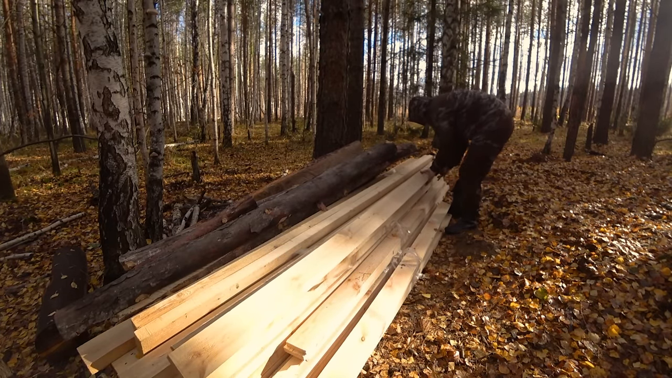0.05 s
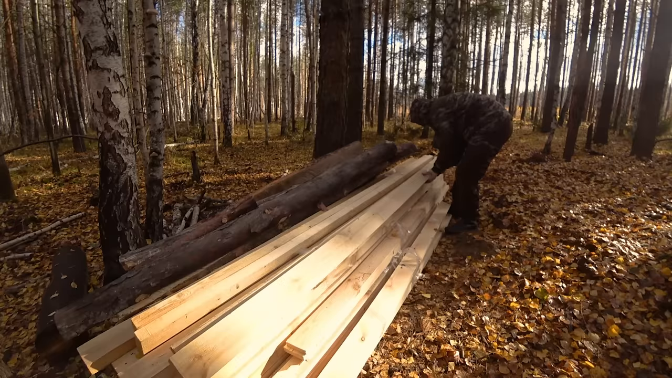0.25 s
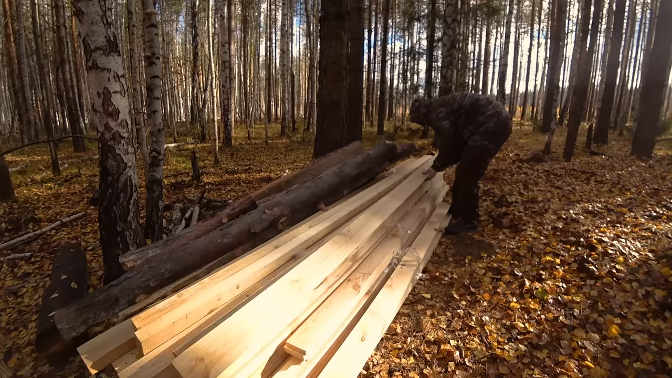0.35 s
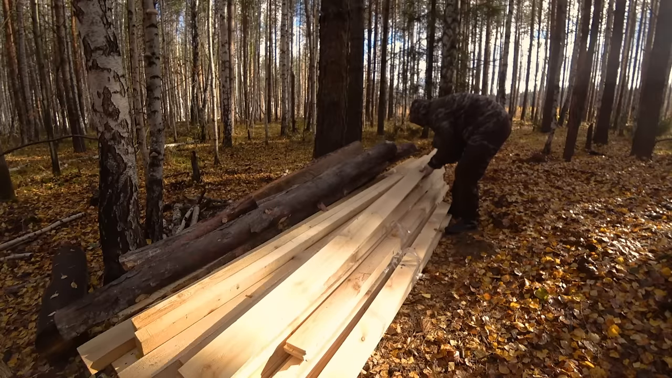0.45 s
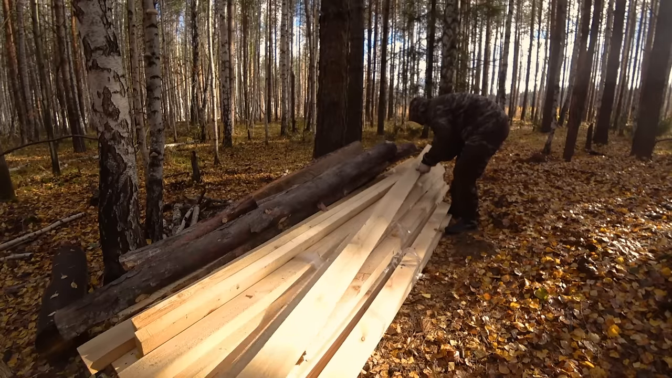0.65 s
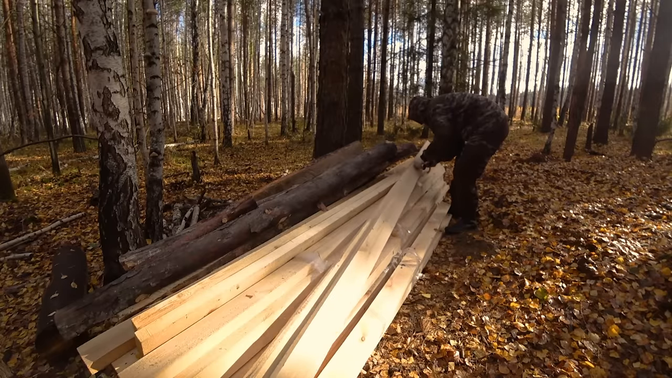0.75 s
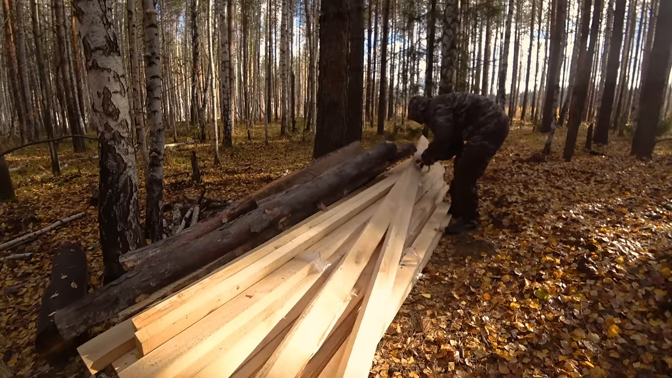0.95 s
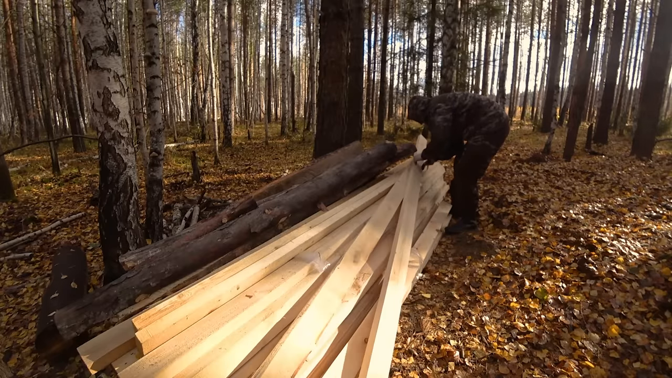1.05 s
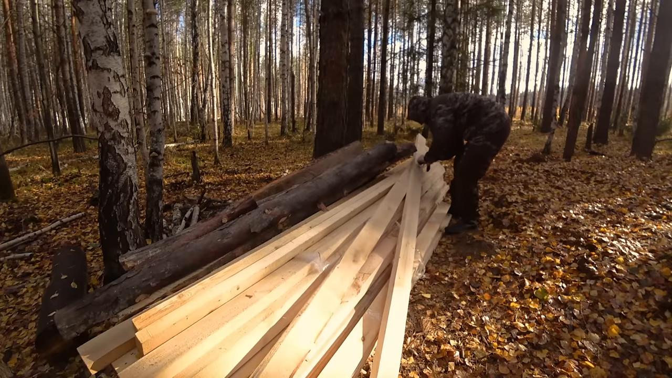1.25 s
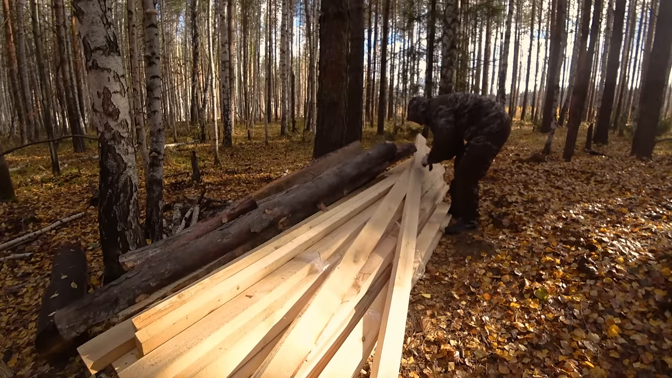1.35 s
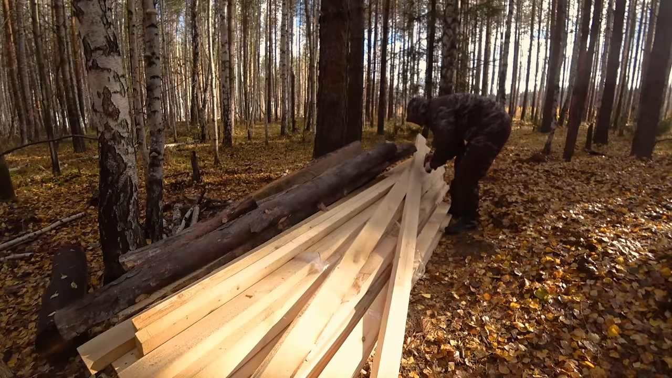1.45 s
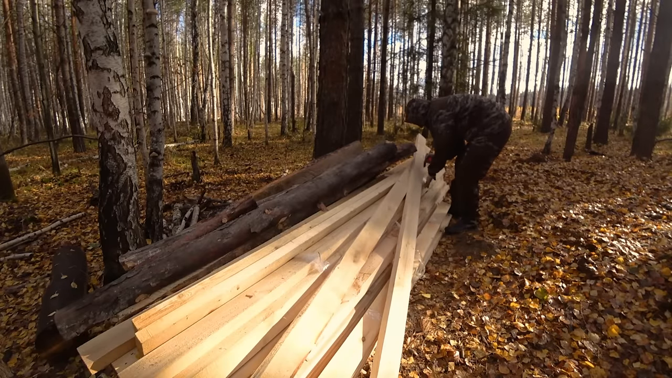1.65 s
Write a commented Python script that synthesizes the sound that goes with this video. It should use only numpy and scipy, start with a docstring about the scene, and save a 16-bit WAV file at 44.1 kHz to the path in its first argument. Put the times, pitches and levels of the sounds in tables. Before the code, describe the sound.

Wooden boards knock and scrape on a pile, with dry leaves crunching in a quiet forest

```python
"""Shifting boards in an autumn forest

Long sawn boards are shifted on a pile, a few metres from a small camera with two microphone ports.
Knocks ring decaying board modes, random grains make the boards slide and the dry leaves crunch,
and short noise bursts snap; a board end thuds on the soil as a low decaying sine.
The trunks return the wood sounds as a short noise tail, over a faint hush of shaped noise."""
import sys
import numpy as np
from scipy import signal
from scipy.fft import rfft, irfft
from scipy.io import wavfile
from scipy.ndimage import uniform_filter1d

SR = 44100
rng = np.random.default_rng(int(sys.argv[2]) if len(sys.argv) > 2 else 0)


def store_pcm(level_fs):
    """Save levels as 16-bit WAV."""
    pcm = np.round(np.clip(level_fs, -1, 1) * 32767).astype(np.int16)
    wavfile.write(sys.argv[1], SR, np.atleast_2d(pcm).T)


N = 77175

# modes of the board that is lifted and dragged: (frequency [Hz], level [dB], full t60 [s])
LIFTED_MODES = [(253, -9, 0.12), (282.6, -13, 0.29), (433, -4.5, 0.032), (522, -6, 0.13),
                (595.7, 0.5, 0.089), (718, 1.5, 0.12), (853.6, 2.5, 0.04)]
# short edge modes that all boards share: (frequency [Hz], level [dB], full t60 [s])
EDGE_MODES = [(1042, 7, 0.015), (1382, 7.5, .02), (1554, 7, 0.018), (1738, 7, 0.033), (1931, 9, 0.034),
              (2176, 13, 0.016), (2620, -1.5, .028)]


def undb(db):
    """Gain of a level in dB."""
    return 10 ** (np.asarray(db) / 20)


def unit(x):
    """Scale to rms 1."""
    return x / np.sqrt(np.mean(x ** 2))


def curve(table, index):
    """A table column in dB as a gain for every sample, at -120 dB outside the table."""
    rows = np.array(table)
    return undb(np.interp(np.arange(N) / SR, rows[:, 0], rows[:, index], left=-120, right=-120))


def over_frequency(table):
    """Second table column at every spectrum bin, interpolated along log frequency."""
    rows = np.array(table)
    hz = np.arange(N // 2 + 1) * SR / N + 1  # 1 Hz up, so that the log exists
    return np.interp(np.log(hz), np.log(rows[:, 0]), rows[:, 1])


def colour(x, table):
    """Shape a spectrum by (frequency [Hz], gain [dB]) points."""
    return irfft(rfft(x) * undb(over_frequency(table)), N)


def ring(x, hz, t60):
    """One decaying mode struck by x: a complex one-pole resonator."""
    pole = np.exp(2j * np.pi * hz / SR - np.log(1000) / (max(t60, .004) * SR))
    return signal.lfilter([1], [1, -pole], x).imag


def band(x, hz, width_hz):
    """Band-pass with four poles."""
    low_hz = np.sqrt(hz ** 2 + width_hz ** 2 / 4) - width_hz / 2
    sos = signal.butter(2, [low_hz, low_hz + width_hz], "bandpass", fs=SR, output="sos")
    return signal.sosfilt(sos, x)


def grains(rate, spread_db):
    """Tiny clicks at random times (rate per second), of random sign and uneven size."""
    chance, sign, size = rng.random((3, N))
    size_db = spread_db * np.minimum(-np.log(1 - size), 4)
    return (chance < rate / SR) * np.sign(sign - .5) * undb(size_db)


def place(t, x):
    """x laid at time t in a silent track."""
    out, start = np.zeros(N), int(t * SR)
    out[start:start + len(x)] = x[:N - start]
    return out


def hush():
    """Steady forest air: noise with a falling spectrum."""
    # colour of the air: (frequency [Hz], relative level [dB per Hz])
    air = [(25, -10.5), (200, -5.5), (740, -10.5), (950, -15), (3300, -25.5), (4500, -21.5), (6000, -30),
           (10000, -39.5), (14000, -47)]
    level_db = -60.5
    return undb(level_db) * unit(colour(rng.standard_normal(N), air))


def trunks(x):
    """Scattered dull echoes off the trunks: x convolved with a decaying noise tail."""
    level_db, t60_s, top_hz, fade_in_s = -18.5, 0.2, 3220, 0.008
    t = np.arange(SR // 2) / SR
    tail = signal.lfilter(*signal.butter(1, top_hz, fs=SR), rng.standard_normal(len(t)))
    tail = tail * undb(-60 * t / t60_s) * np.minimum(t / fade_in_s, 1) ** 2
    tail = tail / np.sqrt(np.sum(tail ** 2))
    return undb(level_db) * signal.fftconvolve(x, tail)[:N]


def thuds():
    """A board end on the soil: a low sine that swells softly and decays."""
    # thuds: (time [s], level ahead of swell and decay [dB], frequency [Hz], t60 [s])
    soil_hits = [(1.191, -26, 81, 0.13), (1.289, -42, 57.4, 0.17)]
    rise_s = 0.017
    t = np.arange(SR // 3) / SR
    out = 0
    for start, db, hz, t60 in soil_hits:
        envelope = undb(db - 60 * t / t60) * (1 - np.exp(-t / rise_s))
        out = out + place(start, envelope * np.sin(2 * np.pi * hz * t))
    return out


def crunch():
    """Dense leaf grains that come in patches; low and high parts follow their own level."""
    # leaf levels: (time [s], rms level below the split [dB], rms level above it [dB])
    levels = [(.224, -53, -80), (.32, -59, -63), (.40, -53, -57.5), (.43, -45.5, -45.5),
              (.46, -48.5, -52.5), (.52, -33.5, -42.5), (.54, -45.5, -50), (.57, -28.5, -40),
              (.61, -43.5, -46.5), (.66, -47, -60), (.71, -39.5, -44), (.78, -50, -54), (.797, -30, -36),
              (.81, -52.5, -58), (.855, -49.5, -61.5), (.885, -51.5, -54), (.96, -43, -61.5),
              (1.0, -32.5, -34.5), (1.045, -40, -41.5), (1.06, -22.5, -34), (1.10, -33, -37),
              (1.125, -42.5, -50.5), (1.17, -37, -44), (1.21, -46, -47), (1.27, -48.5, -50.5),
              (1.38, -53.5, -48), (1.41, -66.5, -70.5), (1.655, -97.5, -82), (1.70, -60.5, -59.5),
              (1.725, -54, -56), (1.75, -88, -77)]
    # colour of the leaves: (frequency [Hz], relative level [dB per Hz])
    leaf = [(1500, -41.5), (2600, -7.5), (3100, -7), (3600, -12.5), (4140, -4), (5400, -6.5), (6860, -14.5),
            (8000, -11.5), (11000, -18.5), (16000, -43)]
    split_hz, patch_hz, patch_db = 4890, 159.3, 2.5
    hold = int(SR / patch_hz)  # samples that one patch lasts
    patches = np.repeat(rng.standard_normal(N // hold + 1), hold)
    patches = uniform_filter1d(patches, hold)[:N]
    leaves = colour(grains(rate=5000, spread_db=3.8) * undb(patch_db * patches), leaf)
    low = signal.sosfiltfilt(signal.butter(3, split_hz, fs=SR, output="sos"), leaves)
    high = leaves - low
    return unit(low) * curve(levels, index=1) + unit(high) * curve(levels, index=2)


def snaps():
    """Dry leaves and splinters: a click and a noisy crumble that dies in milliseconds, in three bands."""
    # snaps: (time [s], peak level ahead of the band levels [dB], extra level of the top band [dB])
    cracks = [(0.4231, -14.5, -18.5), (0.4378, -14, -32), (0.4963, -22, -10.5), (0.5231, -23, -7.5),
              (0.5533, -14.5, -14.5), (.569, -8, -19.5), (0.6898, -16, -16), (0.7034, -15, -15),
              (.760, -30.5, -4.5), (0.7957, -18, -8), (.8184, -24, -21), (0.9761, -9.5, -12),
              (.996, -10, -12), (1.005, -15, -19), (1.0182, -3.5, -16), (1.023, -15, -14),
              (1.0292, -11, -9), (1.102, -10.5, -39), (1.1597, -16.5, -22), (1.18, -16.5, -17),
              (1.1943, -16.5, -18.5), (1.306, -12, -10), (1.3404, -24.5, -16), (1.506, -40.5, -14),
              (1.5285, -58, -3), (1.5355, -51.5, -1.5), (1.551, -47, -16), (1.583, -43.5, -12),
              (1.652, -44, -11.5), (1.667, -41.5, -22), (1.696, -42, -28), (1.7205, -41.5, -33)]
    # bands: (centre [Hz], width [Hz], level [dB])
    bands = [(2820, 1130, -11.5), (4258, 900, -5.5), (7410, 3600, 6)]
    t60_s, click = .011, 1.5
    t = np.arange(SR // 20) / SR
    rise = np.minimum(.45 + t / .0008, 1)  # full after 0.44 ms
    envelope = undb(-60 * t / t60_s) * rise
    out = 0
    for start, peak_db, top_db in cracks:
        burst = (rng.standard_normal(len(t)) + click * (t == 0)) * envelope
        snap = 0
        for (hz, width_hz, band_db), extra_db in zip(bands, (0, 0, top_db)):
            part = band(burst, hz, width_hz)
            snap = snap + undb(peak_db + extra_db + band_db) * part / np.abs(part).max()
        out = out + place(start, snap)
    return out


def rubbed(modes):
    """Stick-slip clicks along the grain ring each mode; neighbours have opposite sign."""
    shorter = .65  # pressed against the pile, the sliding board rings shorter
    out = 0
    for k, (hz, db, t60) in enumerate(modes):
        clicks = grains(rate=1500, spread_db=2.5)
        out = out + (-1) ** k * undb(db) * ring(clicks, hz, shorter * t60)
    return unit(out)


def slide():
    """The dragged board: rubbed low and edge modes, each band-passed and on its own level."""
    # drag: (time [s], low modes ahead of the band-pass [dB], edge modes ahead of the band-pass [dB])
    drag = [(.24, -37, -78.5), (.30, -49, -41), (.38, -47.5, -57), (.46, -54.5, -54.5), (.52, -43, -56),
            (.575, -55.5, -43.5), (.63, -47.5, -44.5), (.715, -50.5, -41), (.745, -64, -47.5),
            (.78, -47, -46), (.85, -63, -58), (.89, -44.5, -45.5), (.94, -46.5, -62.5), (.97, -35.5, -39.5),
            (1.01, -29, -51), (1.045, -28.5, -36), (1.065, -25, -23), (1.10, -53, -36.5),
            (1.13, -62, -52.5), (1.195, -36, -42), (1.25, -63, -63), (1.30, -47.5, -57), (1.42, -92, -102)]
    low = band(rubbed(LIFTED_MODES), 661, 1100)
    edge = band(rubbed(EDGE_MODES), 1500, 2000)
    return low * curve(drag, index=1) + edge * curve(drag, index=2)


def knocks():
    """Each blow is a short push that rings the modes near its centre, neighbours in opposite sign."""
    # knocks: (time [s], peak level [dB], centre of the modes that the blow reaches [Hz])
    blows = [(.2245, -9, 552), (.234, -8.5, 902), (0.2383, -8.5, 745), (.240, -11, 371), (.2505, -10, 599),
             (0.566, -24.5, 329), (.569, -22.5, 980), (.675, -29, 1680), (0.6901, -12.5, 1890),
             (.703, -15.5, 1920), (0.744, -25.5, 1907), (.765, -27.5, 1800), (.797, -23, 2230),
             (1.052, -18.5, 1900), (1.057, -8.5, 1944), (1.055, -19.5, 300), (1.063, -9.5, 878),
             (1.074, -13, 1920), (1.110, -20.5, 1080), (1.282, -34, 530), (1.306, -26.5, 2030),
             (1.318, -33.5, 530), (1.328, -36.5, 261.6), (1.344, -28.5, 1580)]
    # modes of the board that lies on the pile: (frequency [Hz], level [dB], full t60 [s])
    lying_modes = [(153, -13, .35), (288, -1, .2), (446, -2, .13), (627, 0, .13), (714, 1, .07),
                   (830, -1, .11)]
    lift_s = .5  # from here on the blows ring the lifted board
    contact_cycles, full_reach_oct = 0.47, 0.87
    soft_reach, soft_ring = 1.45, 1.14  # dB per dB: a softer blow reaches fewer modes, rings shorter
    t = np.arange(SR // 3) / SR
    out = 0
    for start, peak_db, centre_hz in blows:
        contact = np.minimum(t * centre_hz / contact_cycles, 1)
        push = band(np.sin(np.pi * contact) ** 2, centre_hz, 1.9 * centre_hz)
        reach_oct = full_reach_oct * undb(soft_reach * (peak_db + 21.5) * (peak_db < -20))
        shorter = undb(soft_ring * min(peak_db + 22, 0))
        modes = (lying_modes if start < lift_s else LIFTED_MODES) + EDGE_MODES
        knock = 0
        for k, (hz, db, t60) in enumerate(modes):
            distance = np.log2(hz / centre_hz) / reach_oct
            gain = undb(db - 7.7 * distance ** 2)
            knock = knock + (-1) ** k * gain * ring(push, hz, shorter * t60)
        # the push begins one cycle ahead of the listed time
        out = out + place(start - 1 / centre_hz, undb(peak_db) * knock / np.abs(knock).max())
    return out


def scene():
    """Both ports hear the pile alike but for a lead in phase, and a little separate hush and crunch."""
    # phase between the ports: (frequency [Hz], lead of the left port [rad], negative where it lags)
    port_lead = [(60, -.15), (250, -0.45), (600, -0.94), (4000, -0.43), (14000, -0.58)]
    hush_side_db, crunch_side_db = -21.5, -26  # relative to the hush and crunch in the middle
    wood_low_cut = signal.butter(3, 151, "high", fs=SR, output="sos")
    wood = signal.sosfilt(wood_low_cut, knocks() + snaps() + slide())
    mid = wood + trunks(wood) + crunch() + thuds() + hush()
    # a quarter-turned copy, added left and subtracted right, turns the two phases apart
    side = irfft(rfft(mid) * 1j * np.tan(over_frequency(port_lead) / 2), N)
    side = side + undb(hush_side_db) * hush() + undb(crunch_side_db) * crunch()
    return np.array([mid + side, mid - side])


def record(dry):
    """The camera cuts the top with a steep low-pass."""
    top_hz = 16300
    return signal.sosfilt(signal.ellip(10, .2, 80, top_hz, fs=SR, output="sos"), dry)


dry = scene()
out = record(dry)
store_pcm(out)
```